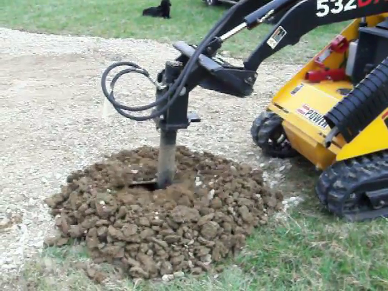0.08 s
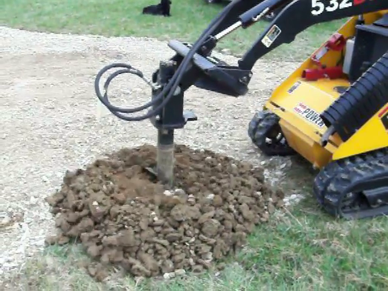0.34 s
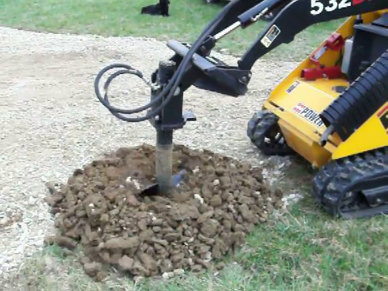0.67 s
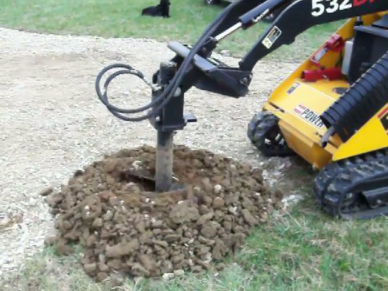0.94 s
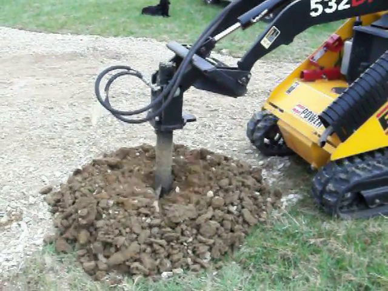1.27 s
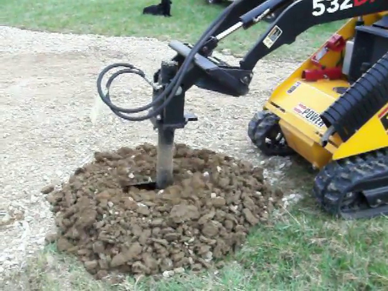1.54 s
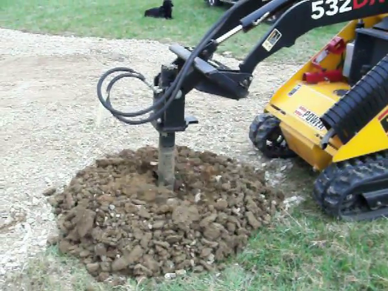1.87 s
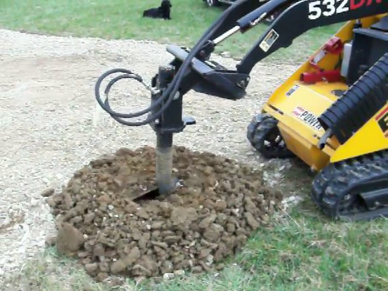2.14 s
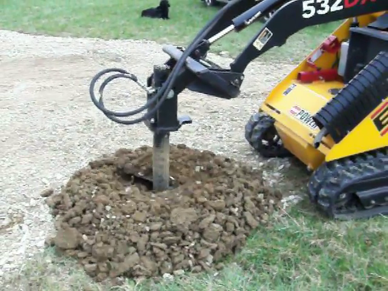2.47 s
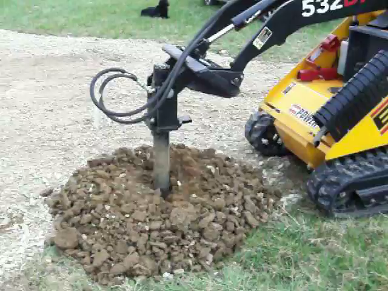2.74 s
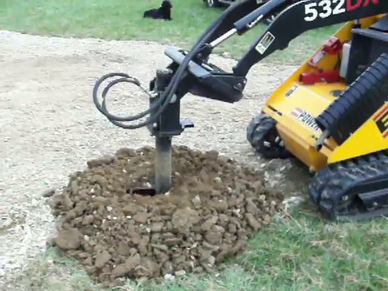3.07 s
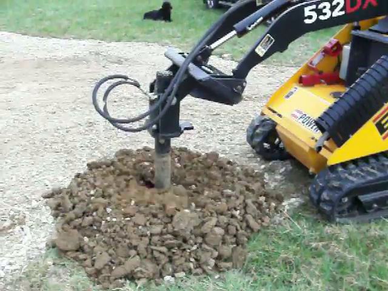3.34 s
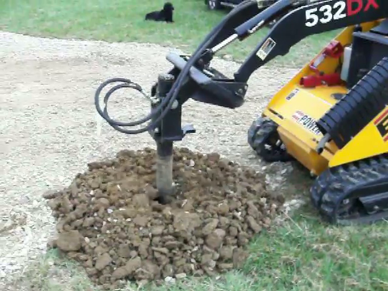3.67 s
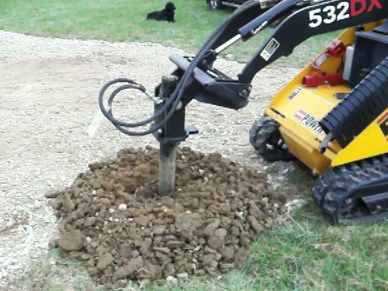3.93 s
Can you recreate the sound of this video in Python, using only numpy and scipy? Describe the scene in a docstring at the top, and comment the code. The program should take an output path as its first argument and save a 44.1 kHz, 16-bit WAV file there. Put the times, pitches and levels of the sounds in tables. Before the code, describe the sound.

A small loader engine drones at full throttle as its auger grinds through stony soil.

```python
"""Outdoors on stony ground, a small loader runs at full throttle while its hydraulic auger turns.
Engine tones and a pump drone follow the crankshaft, over a rough exhaust roar and a bright steel rattle.
Stones grind on the auger, clods knock and crumbs tick, with a low rumble underneath.
The whole mix is driven hard: a limiter ducks after the peaks, and a few overloads snap as sharp clicks."""
import sys
import numpy as np
from scipy import signal
from scipy.fft import rfft, irfft
from scipy.io import wavfile

SR = 44100
rng = np.random.default_rng(int(sys.argv[2]) if len(sys.argv) > 2 else 0)


def wav_out(sig):
    """Save sig, one row per channel (or a flat mono array), as 16-bit PCM at SR to the path in sys.argv[1]."""
    wavfile.write(sys.argv[1], SR, np.round(np.clip(np.atleast_2d(sig).T, -1, 1) * 32767).astype(np.int16))


N = 176400
T = np.arange(N) / SR
FREQS = np.fft.rfftfreq(N, 1 / SR)


def amp(db):
    """Decibels to gain."""
    return 10 ** (np.asarray(db) / 20)


def unit(x):
    """Scales to rms 1."""
    return x / np.sqrt(np.mean(x ** 2) + 1e-20)


def curve(points):
    """An automation line through (time, value) points."""
    return np.interp(T, *np.transpose(points))


def arch(centre, length):
    """A half-sine fade in and out; centre and length in seconds."""
    return np.cos(np.pi * np.clip((T - centre) / length, -.5, .5))


def colour(x, points):
    """Shapes x with an EQ curve of (frequency [Hz], gain [dB]), then scales to rms 1."""
    hz, db = np.transpose(points)
    eq = amp(np.interp(np.log(FREQS + 1), np.log(hz), db))
    return unit(irfft(rfft(x) * eq, N))


def drift(hz):
    """Random wander up to about the given rate, rms 1."""
    smoothing = (FREQS > 0) * np.exp(-(FREQS / hz) ** 2)
    return unit(irfft(rfft(rng.standard_normal(N)) * smoothing, N))


def lowpass(x, hz, taps):
    """A steep high cut."""
    return signal.oaconvolve(x, signal.firwin(taps, hz, window=("kaiser", 9), fs=SR), "same")


def tones(turns, orders, waver_db, waver_hz, slip_rad):
    """Sines at multiples of a rotation, each wavering in level and phase."""
    out = np.zeros(N)
    for multiple, db in orders:
        peak = np.sqrt(2) * amp(db + waver_db * drift(waver_hz))
        phase = 2 * np.pi * (multiple * turns + rng.random()) + slip_rad * drift(waver_hz)
        out += peak * np.sin(phase)
    return out


def throb(turns, depth):
    """Swells twice in every turn of the crank, with the exhaust pulses."""
    return 1 + depth * np.cos(2 * np.pi * 2 * turns)


# The engine's pitched core (multiple of crank speed, level [dB])
ENGINE_ORDERS = [(1, -30.5), (2, -18), (3, -28.5), (4, -38), (6, -39.5), (8, -34), (9, -44)]
# Body of the exhaust and fan roar (frequency [Hz], relative level [dB])
ROAR_EQ = [(20, -9), (100, -4.5), (135, -3.5), (155, -1.5), (185, -1.5), (212, 4), (270, -3.5), (350, -2),
           (480, -5.5), (510, -10), (595, -10.5), (640, -7.5), (830, -4.5), (915, -7), (950, -12.5),
           (1120, -23), (1600, -32), (3000, -57)]
def engine(turns):
    """Steady engine tones over the rough roar of exhaust and fan."""
    gusts = throb(turns, depth=0.036) * amp(1.2 * drift(hz=91) + 0.28 * drift(hz=6))
    roar = colour(rng.standard_normal(N) * gusts, ROAR_EQ)
    hum = tones(turns, ENGINE_ORDERS, waver_db=.45, waver_hz=5, slip_rad=.03)
    return hum + amp(-17.5) * roar


# Partials of the hydraulic drone (multiple of pump rate, level before the fader [dB])
PUMP_ORDERS = [(1, -22), (2, -35)]
# Fader ride on the drone (time [s], gain [dB])
PUMP_FADER = [(0, 2), (.6, -0.5), (1.1, 1), (1.7, 1), (2.3, 0), (3.1, -2), (3.5, 1.5), (4, -2.5)]
def hydraulics(turns, pump_per_turn=4.2726, whine_hz=530.2):
    """The pump drones at a fixed ratio to the crank, beside a thin steady whine."""
    drone = tones(turns * pump_per_turn, PUMP_ORDERS, waver_db=.6, waver_hz=6, slip_rad=.1)
    whine = tones(whine_hz * T, [(1, -38)], waver_db=1.5, waver_hz=3, slip_rad=.15)
    return amp(curve(PUMP_FADER)) * drone + whine


# Bright, steely colour of the rattle (frequency [Hz], relative level [dB])
RATTLE_EQ = [(500, -43), (1100, -2), (1400, 7.5), (1480, 1.5), (1560, -10.5), (1690, -4), (1780, 3.5),
             (2000, -5), (2200, -1.5), (2290, -1), (2450, -4), (2780, 3.5), (3000, 1.5), (3230, -3.5),
             (3680, 2), (4300, -7.5), (5100, -6.5), (5700, -12.5), (6200, -39.5)]
# Fader ride on the rattle (time [s], level [dB])
RATTLE_FADER = [(0, -30), (.2, -30.5), (.27, -24.5), (.38, -30.5), (.46, -27), (.6, -30), (.75, -26),
                (1.2, -30), (1.4, -25.5), (1.6, -29), (2.1, -27.5), (2.35, -29.5), (2.5, -27), (2.72, -28),
                (2.86, -26.5), (3.2, -30.5), (3.38, -28), (3.74, -30.5), (3.85, -28.5), (4, -31)]
def rattle(turns):
    """Engine and hydraulics chatter and hiss through the broad resonances of the steel body."""
    chatter = throb(turns, depth=0.053) * amp(drift(hz=248) + .5 * drift(hz=9.2))
    return colour(rng.standard_normal(N) * chatter, RATTLE_EQ) * amp(curve(RATTLE_FADER))


# Stone scrape cues (centre time [s], level [dB], pitch [Hz], length [s])
GRINDS = [(1.343, -30, 765, 0.076), (1.77, -23, 217, 0.21), (2.263, -18.5, 818, 0.074),
          (2.841, -23, 470, 0.066), (2.942, -18.5, 880, 0.042), (3.289, -14.5, 221, 0.14),
          (3.374, -23, 710, 0.028)]
def grinds(log_width=0.081):
    """A stone drags along the auger: a short swell of noise in one narrow resonance."""
    out = np.zeros(N)
    for centre, db, hz, length in GRINDS:
        resonance = np.exp(-(np.log(FREQS / hz + 1e-9) / log_width) ** 2)
        ring = unit(irfft(rfft(rng.standard_normal(N)) * resonance, N))
        out += amp(db) * ring * arch(centre, length)
    return out


# Dull colour of earth knocking on the auger (frequency [Hz], relative level [dB])
CLOD_EQ = [(150, -8.5), (300, -1), (850, -2.5), (1050, -9), (1400, -9.5), (1700, -19.5), (3600, -17),
           (5000, -29.5), (6200, -52)]
def clods(per_second=45, decay_s=0.0036):
    """Lumps of earth strike at random, each a dull puff that dies at once."""
    hits = (rng.random(N) < per_second / SR) * rng.uniform(0.13, 1, N)
    envelope = signal.lfilter([1], [1, -np.exp(-1 / (decay_s * SR))], hits)
    return amp(-27) * colour(envelope * rng.standard_normal(N), CLOD_EQ)


def crumbs(per_second=160, pitches=24, decay_cycles=2.5):
    """Crumbs and small stones tick softly against the auger and tumble down the heap."""
    t, out = np.arange(512) / SR, np.zeros(N)
    for hz in np.geomspace(750, 3700, pitches):
        hits = rng.random(N) < per_second / pitches / SR
        accents = amp(4.4 * np.minimum(rng.exponential(1, N), 2))
        envelope = (1 - np.exp(-t * hz)) * np.exp(-t * hz / decay_cycles)
        tick = np.sin(2 * np.pi * hz * t) * envelope
        out += signal.oaconvolve(hits * accents, tick)[:N]
    return amp(-36) * unit(out)


# Weight of the low end (frequency [Hz], relative level [dB])
RUMBLE_EQ = [(8, 4.5), (25, -21), (42, 5), (56, 11.5), (72, -0.5), (110, -23), (300, -61)]
# Fader ride on the rumble (time [s], level [dB])
RUMBLE_FADER = [(0, -19), (.2, -30.5), (.3, -30), (.72, -30), (.85, -23), (.97, -29), (2.1, -38.5),
                (2.3, -18.5), (2.8, -26.5), (3.1, -16), (3.45, -35), (3.65, -22), (4, -27)]
def rumble():
    """A bed of low noise that comes and goes."""
    return colour(rng.standard_normal(N), RUMBLE_EQ) * amp(curve(RUMBLE_FADER))


# Crankshaft revs, sagging as the auger bites (time [s], speed [turns/s])
CRANK_SPEED = [(0.0, 54.92), (0.18, 57.51), (0.3, 57.14), (0.6, 56.82), (0.85, 56.86), (1.1, 57.16),
               (1.35, 57.28), (1.55, 57.09), (2.15, 57.35), (2.3, 56.22), (2.45, 57.16), (2.65, 56.82),
               (2.95, 57.46), (3.1, 56.22), (3.5, 57.15), (3.65, 55.62), (3.8, 57.24), (4.0, 54.97)]
def scene():
    """One crankshaft drives engine, pump and rattle; the digging and rumble join them in mono."""
    turns = np.cumsum(curve(CRANK_SPEED)) / SR
    machine = engine(turns) + hydraulics(turns) + rattle(turns)
    return (machine + rumble() + crumbs() + clods() + grinds())[None]


# Overload snap cues (centre time [s], level before clipping [dB], pitch [Hz], length [ms])
CLICKS = [(0.8395, 0, 3660, 0.83), (2.6442, 0.6, 4300, 0.83), (3.666, 0, 3680, 0.83),
          (3.949, -1.5, 4040, 0.39), (3.9936, -1, 3930, .45)]
def overload(x, swell_s=0.002, swell_db=-.5, swing_offset=0.26):
    """Each overload takes over the sound with a short swell and a few full-scale swings on its crest."""
    for centre, db, hz, ms in CLICKS:
        swell, burst = arch(centre, swell_s) ** 2, arch(centre, ms / 1000)
        swings = amp(db) * (swing_offset + np.cos(2 * np.pi * hz * (T - centre)))
        x = x * (1 - swell) + amp(swell_db) * swell
        x = x * (1 - np.sqrt(burst)) + burst * swings
    return x


def limiter(x, threshold_db=-7, slope=1.405, lag_s=.0008, attack_s=.0002, release_s=0.011):
    """Gain that ducks abruptly a moment after each peak over the threshold and soon recovers."""
    duck_db = slope * np.maximum(20 * np.log10(abs(x) + 1e-9) - threshold_db, 0)
    fall = T / release_s  # each duck fades exponentially until a deeper one takes over
    held_db = np.exp(np.maximum.accumulate(np.log(duck_db + 1e-9) + fall) - fall)
    late_db = np.interp(T - lag_s, T, held_db)
    pole = np.exp(-1 / (attack_s * SR))
    return amp(-signal.lfilter([1 - pole], [1, -pole], late_db))


def record(dry):
    """The limiter ducks after peaks and overloads; the band is narrow, and the overloads clip."""
    ducked = dry[0] * limiter(overload(dry[0]))
    narrow = lowpass(overload(ducked), hz=5800, taps=121)
    clipped = np.clip(narrow, -1, 1)
    return lowpass(clipped, hz=16300, taps=601)[None]


dry = scene()
out = record(dry)
wav_out(out)
```